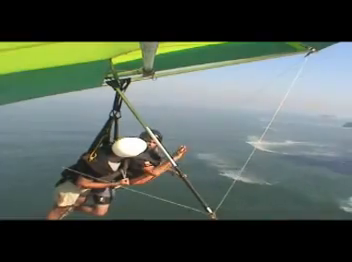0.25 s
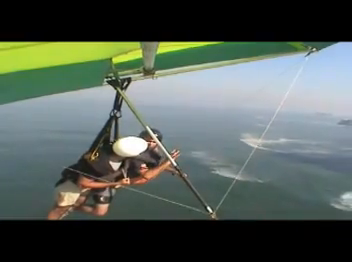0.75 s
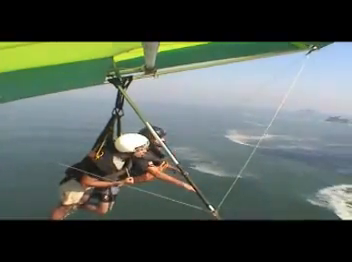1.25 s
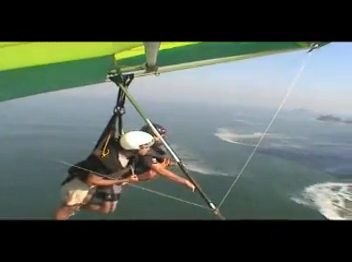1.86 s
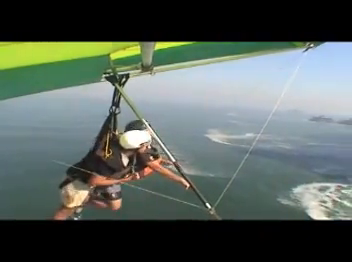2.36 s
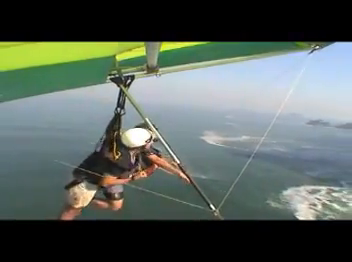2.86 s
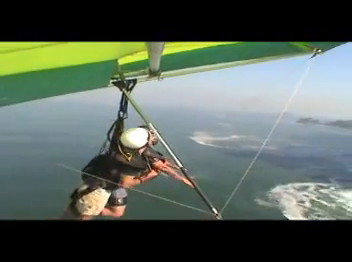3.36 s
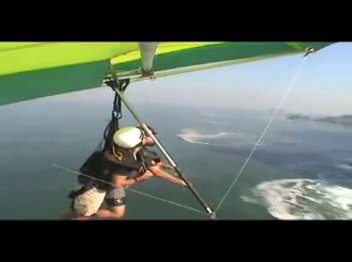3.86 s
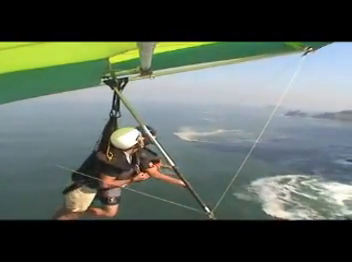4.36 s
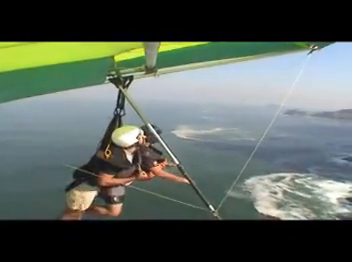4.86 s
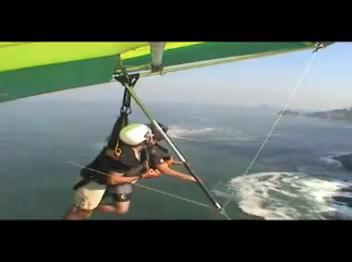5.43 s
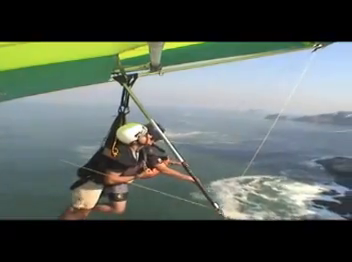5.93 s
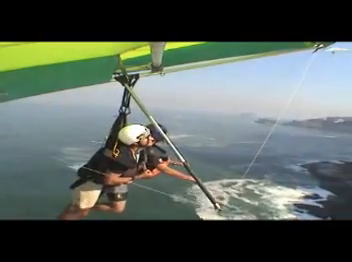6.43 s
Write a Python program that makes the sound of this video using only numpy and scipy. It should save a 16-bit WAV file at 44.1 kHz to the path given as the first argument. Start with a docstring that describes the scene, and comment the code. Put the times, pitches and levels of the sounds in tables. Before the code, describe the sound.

Loud wind roars from the very start, blowing point blank on a bare stereo microphone fixed to a hang glider over the sea. The roar is dense, strongest in the low midrange, and wide, buffeting the left and right sides unevenly. It overloads the microphone, so the peaks sound flattened and carry a gritty, flickering crackle. A fainter hiss of air spurts behind it.

At about 1.1 seconds the sound cuts out abruptly for an eighth of a second, then returns at full strength and a little brighter. The wind stays nearly constant afterwards, with slight swells around 1.9 and 3.5 seconds and small quick gusts near 2.9, 3.8 and 4 seconds. The hiss and grit grow slightly brighter from 4.5 to 5.2 seconds. After a short dip and surge around 6.2 seconds, the roar continues to the end at about 6.7 seconds.

```python
"""Wind on a bare stereo microphone, point blank, on the frame of a hang glider out over the sea.
Eddies buffet the two ports, mostly pushing on one while they pull on the other, and their roar
overloads the input. A gritty, flickering noise is added on the loudest crests. Behind the roar, air
hisses past the edges of the camera housing. The sound cuts out once for an eighth of a second."""
import sys
import numpy as np
from scipy import signal
from scipy.fft import rfft, irfft, next_fast_len
from scipy.io import wavfile
from scipy.ndimage import uniform_filter1d

SR = 44100
rng = np.random.default_rng(int(sys.argv[2]) if len(sys.argv) > 2 else 0)


def unload_audio(sound):
    """Save the sound as a 16-bit wav file, at the path given as the first command line argument."""
    columns = np.transpose(np.atleast_2d(sound))
    # keep every value between -1 and 1, then stretch to whole-number steps
    steps = np.round(np.clip(columns, -1, 1) * 32767)
    wavfile.write(sys.argv[1], SR, steps.astype(np.int16))


N = 295029

# slow course of the wind at the microphone: (time [s], flow strength [dB], treble level [dB])
AIRSTREAM = [(0.0, 0.2, -1), (0.45, -0.5, -1.2), (0.75, 0.4, -1), (1.25, 0.2, 2), (1.5, 0.3, -1.5),
             (1.9, 1.2, 0.5), (2.3, -1, -0.5), (2.6, 0.5, 0.5), (2.85, -1.8, -2), (3.15, 0, -0.5),
             (3.47, 1.2, 0.2), (4.0, 0.8, -0.6), (4.55, 0.7, 1.6), (5.2, 0.4, 1.6), (5.5, -1, -0.5),
             (5.95, -0.3, -0.2), (6.45, -0.4, 0.7), (6.68, -0.9, -0.5)]
# single surges of wind, negative for lulls: (centre time [s], length [s], strength [dB])
WIND_SURGES = [(0.225, 0.3, -1.5), (0.724, 0.15, 1.8), (1.07, 0.15, -4), (1.433, .12, -1.5),
               (2.917, 0.23, 2.1), (3.04, .1, -1.5), (3.648, 0.078, 0.4), (3.826, 0.073, 2),
               (3.903, 0.087, -2.5), (3.99, .07, 2), (5.99, 0.059, 1.5), (6.225, 0.1, -3),
               (6.286, 0.055, 2.2)]
# eddy pressure on the ports: (frequency [Hz], level [dB])
BUFFET_SPECTRUM = [(20, -25), (60, -16), (100, -14), (170, -5.5), (280, -1), (450, 1.5), (700, 0),
                   (1000, -5.5), (1500, -14.5), (2400, -27), (4000, -41.5), (8000, -69)]
# how the right port follows the left: (frequency [Hz], likeness [0-1], phase lead [rad])
PORT_LIKENESS = [(40, 0.53, 2.7), (160, 0.6, 2.44), (348, 0.57, 2.9), (760, 0.54, 3.2), (1090, 0.3, 3.43),
                 (2000, 0.41, 3.74), (5030, 0.24, 4.3)]
# gritty noise added on the loudest crests: (frequency [Hz], level [dB])
GRIT_SPECTRUM = [(300, -2), (1000, 2), (2500, -4), (5000, -10.5), (8000, -18.5), (12500, -26.5),
                 (14000, -36)]
# air tearing past the edges of the housing: (frequency [Hz], level [dB])
HISS_SPECTRUM = [(500, 1.5), (1500, -1.5), (2500, -0.5), (4000, -4.5), (6000, -10), (9000, -13.5),
                 (13000, -19), (16000, -26)]
# the gap where the sound cuts out: (start [s], end [s])
GAP = (1.109, 1.2328)


def wind_roar(flow_db):
    """Eddies right on the ports: stronger flow breaks big ones into small, so gusts sound brighter."""
    pressure = turbulence(BUFFET_SPECTRUM)
    big_eddies = signal.sosfiltfilt(signal.butter(2, 330, fs=SR, output="sos"), pressure)
    big_eddy_db = 1.5 - 0.7 * flow_db
    roar = pressure + (from_db(big_eddy_db) - 1) * big_eddies
    roar *= from_db(-0.93 + 0.64 * flow_db + 1.45 * flutter(rate=26.6))
    small_eddies = resonance(roar, hz=1250, width_hz=1400)
    return roar + (from_db(0.7 * flow_db) - 1) * small_eddies


def turbulence(spectrum):
    """Random pressure at both ports; an eddy that spans the two meets them nearly in opposite phase."""
    size = next_fast_len(N)
    hz = np.arange(size // 2 + 1) * SR / size
    left, unshared = rfft(rng.standard_normal((2, size)))
    likeness, lead = at_hz(PORT_LIKENESS, hz)
    right = likeness * np.exp(1j * lead) * left + np.sqrt(1 - likeness ** 2) * unshared
    level_db, = at_hz(spectrum, hz)
    pressure = irfft(np.array([left, right]) * from_db(level_db), size)
    return rms_one(pressure[:, :N])


def airstream():
    """Flow and treble at the microphone, in dB: a slow course, single surges and chance gusts."""
    flow_db, treble_db = in_time(AIRSTREAM)
    gust_db = surges() + 0.5 * flutter(rate=11)[0]
    return flow_db + gust_db, treble_db + gust_db


def surges():
    """Each surge or lull of the wind comes and goes as a smooth bell, in dB."""
    t = np.arange(N) / SR
    return sum(db * np.cos(np.pi * np.clip((t - centre) / length, -0.5, 0.5)) ** 2
               for centre, length, db in WIND_SURGES)


def overload(x, knee=5.8):
    """The microphone's input stage flattens every crest, with a slightly rounded corner."""
    return x / (1 + np.abs(x) ** knee) ** (1 / knee)


def grit(dry, follow_s=0.0014, growth=1.14):
    """A gritty, flickering noise, strongest on the loudest crests, rising with treble and surges."""
    _, treble_db = in_time(AIRSTREAM)
    power = uniform_filter1d(dry ** 2, int(follow_s * SR)) / np.mean(dry ** 2)
    flicker_db = 1.1 * flutter(rate=33)[0] + 0.3 * flutter(rate=10)[0]
    level = from_db(-23.5 + 0.9 * treble_db + 0.45 * surges() + flicker_db)
    return level * np.maximum(power, 0) ** (growth / 2) * turbulence(GRIT_SPECTRUM)


def dropout(cut_db=21.0, fade_s=0.03):
    """The gain collapses within milliseconds, lets a faint rest die away, and comes back."""
    t = np.arange(N) / SR
    start, end = GAP
    dying = from_db(-cut_db - 60 * np.maximum(t - start, 0) / fade_s)
    gain = np.where((t > start) & (t < end), dying, 1)
    return uniform_filter1d(gain, size=70)


def edge_hiss(treble_db, spurt_db=3.0, patchy_db=1.5):
    """Fine eddies tear off the housing in short spurts, close by; the right port is brighter."""
    hiss = turbulence(HISS_SPECTRUM)
    hiss *= from_db(-23 + treble_db + spurt_db * flutter(rate=230) + patchy_db * flutter(rate=16))
    hiss[1] += 0.84 * resonance(hiss[1], hz=4700, width_hz=3300)
    return hiss


def flutter(rate):
    """Random wavering of spread 1, separate for each port, smoothed above `rate` in Hz."""
    pole = np.exp(-80 * np.pi * rate / SR)
    noise = rng.standard_normal((2, N // 40 + 2002))  # one value per 40 samples
    slow = signal.lfilter([1], [1, -2 * pole, pole * pole], noise)[:, 2000:]
    return np.array([np.interp(np.arange(N) / 40, np.arange(len(port)), rms_one(port)) for port in slow])


def resonance(x, hz, width_hz):
    """A two-pole band with gain 1 on top."""
    radius = np.exp(-np.pi * width_hz / SR)
    feedback = [1, -2 * radius * np.cos(2 * np.pi * hz / SR), radius * radius]
    return signal.lfilter(np.array([1, 0, -1]) * (1 - radius * radius) / 2, feedback, x)


def in_time(rows):
    """Each column of a curve at every sample."""
    times, *columns = np.transpose(rows)
    return [np.interp(np.arange(N) / SR, times, column) for column in columns]


def at_hz(rows, hz):
    """Each column of a table, read on a log-frequency axis."""
    points, *columns = np.transpose(rows)
    return [np.interp(np.log(hz + 1), np.log(points), column) for column in columns]


def from_db(db):
    """Decibels to gain."""
    return 10 ** (np.asarray(db) / 20)


def rms_one(x):
    """Scale to an rms of 1."""
    return x / np.sqrt(np.mean(x ** 2) + 1e-20)


def scene():
    """The wind at the microphone: roar in front, hiss behind, rising together in the gusts."""
    flow_db, treble_db = airstream()
    return wind_roar(flow_db) + edge_hiss(treble_db)


def record(dry, coupling_hz=14, dull_hz=4800, cutoff_hz=15800):
    """The wind overloads the input; then come added grit, one dropout, a clip and a top cut."""
    coupling = signal.butter(1, coupling_hz, "high", fs=SR, output="sos")
    sagging = signal.sosfilt(coupling, overload(dry))
    rounded = signal.sosfilt(signal.butter(2, dull_hz, fs=SR, output="sos"), sagging)
    gritty = rounded + grit(dry)
    clipped = np.clip(from_db(-0.3) * gritty * dropout(), -1, 1)
    return signal.sosfilt(signal.butter(12, cutoff_hz, fs=SR, output="sos"), clipped)


dry = scene()
out = record(dry)
unload_audio(out)
```